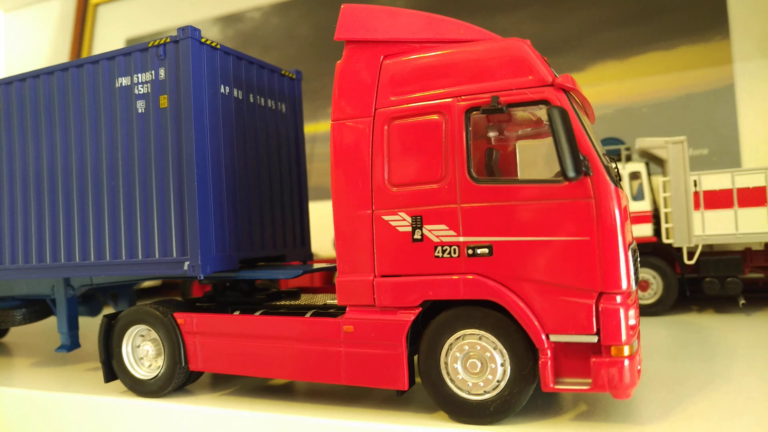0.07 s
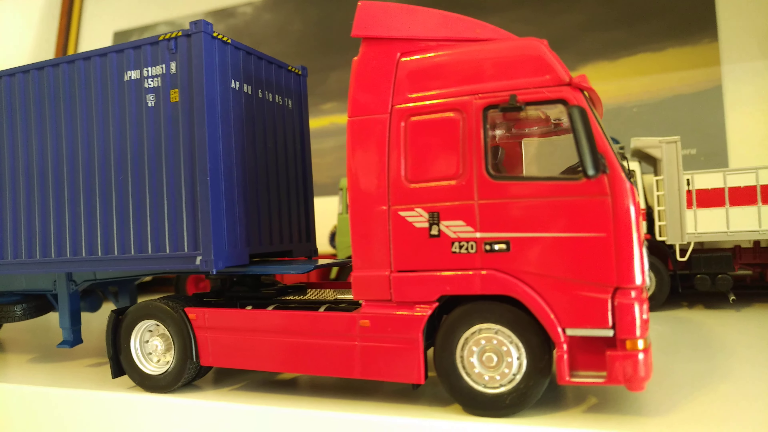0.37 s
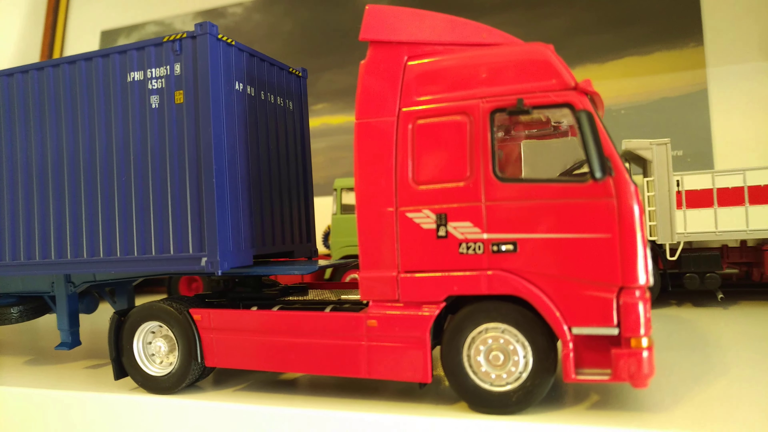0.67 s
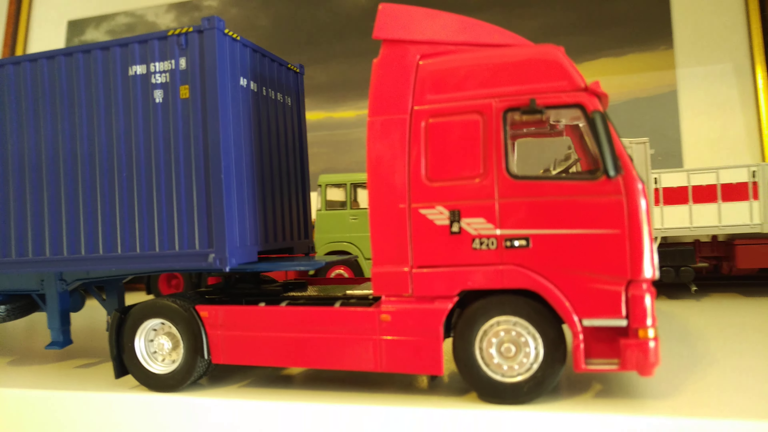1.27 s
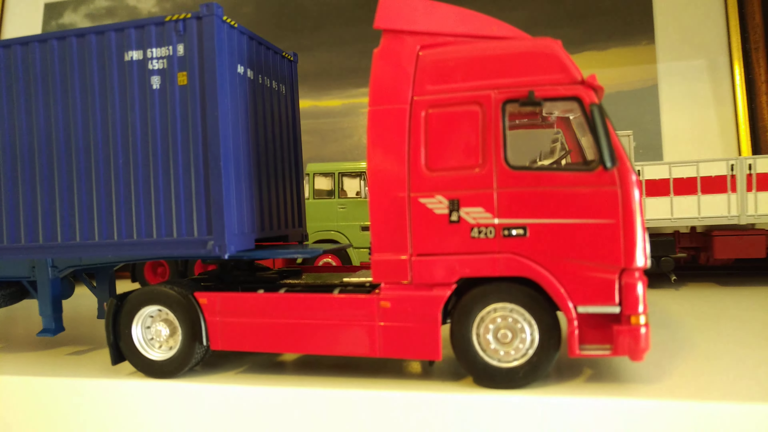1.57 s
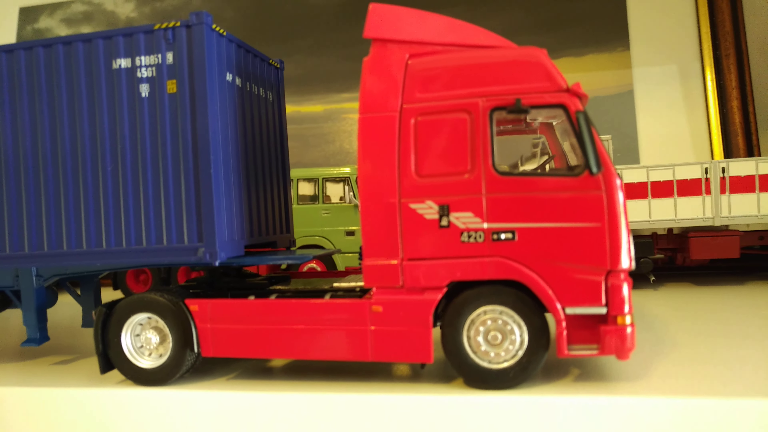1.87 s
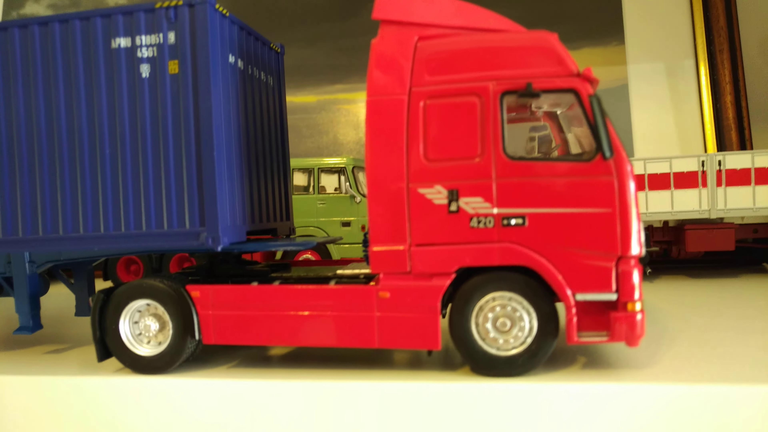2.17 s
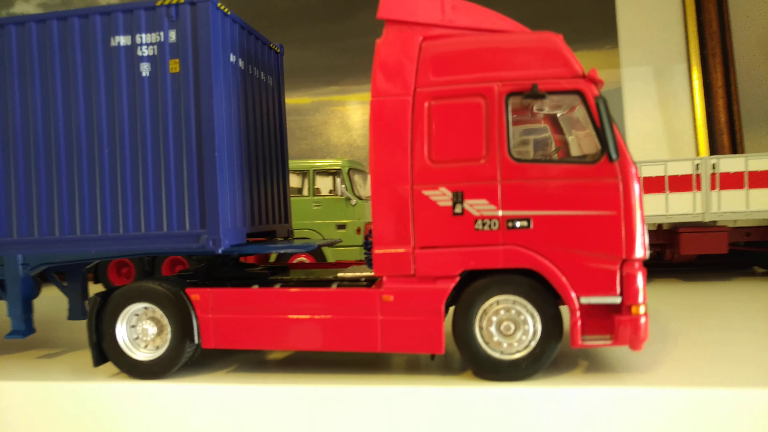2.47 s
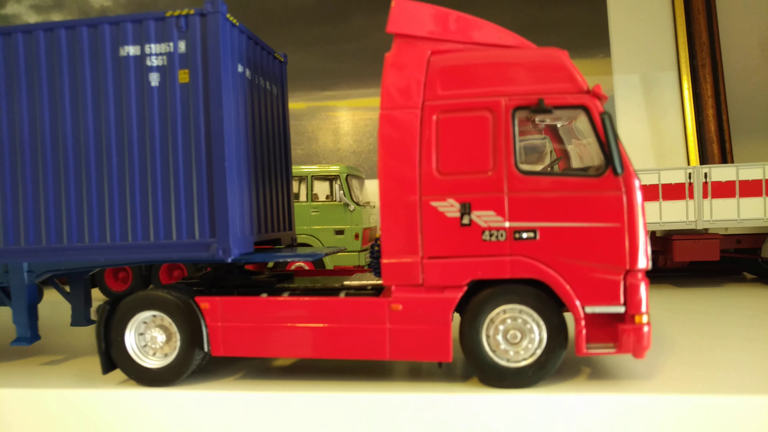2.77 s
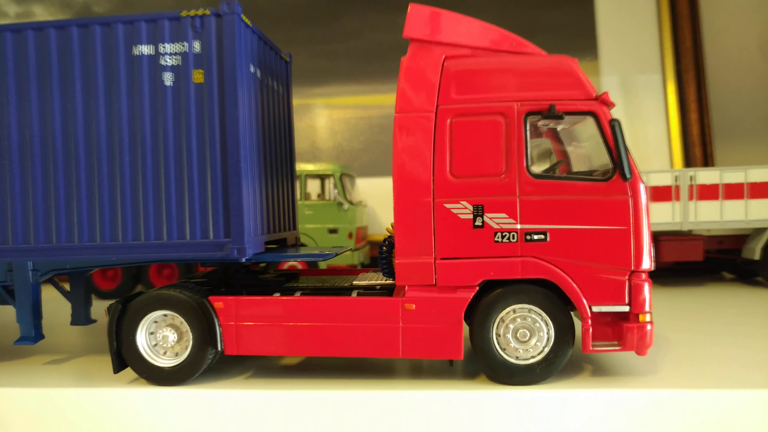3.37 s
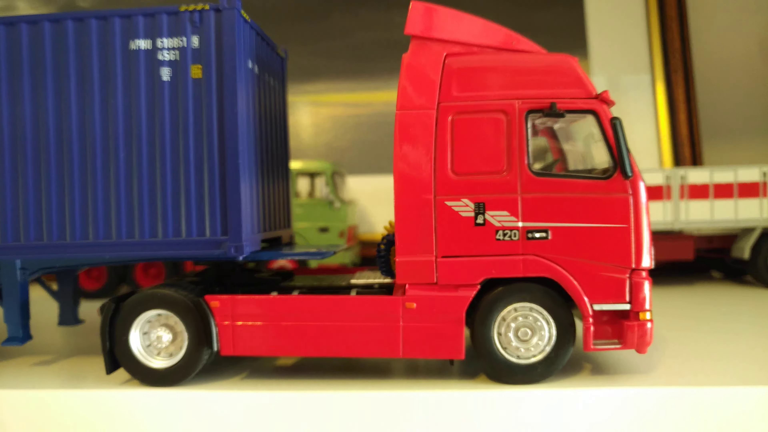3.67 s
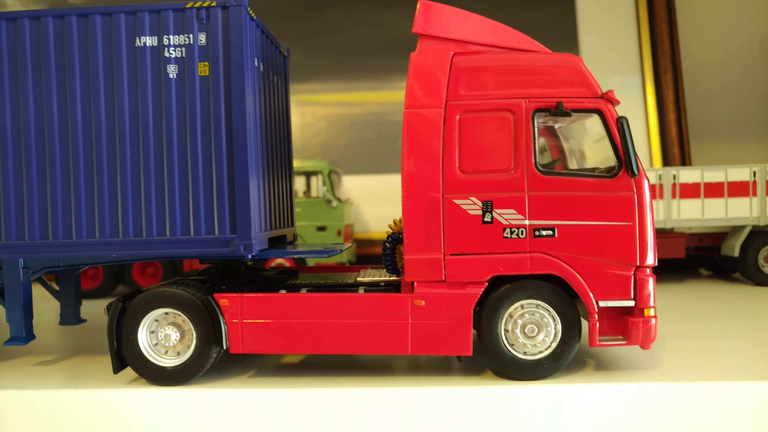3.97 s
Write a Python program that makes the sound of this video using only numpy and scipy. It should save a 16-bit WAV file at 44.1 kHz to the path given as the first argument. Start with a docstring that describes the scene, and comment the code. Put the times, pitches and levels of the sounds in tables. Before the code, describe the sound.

A camera lens motor buzzes from the start, thin and high, close on the right, with hiss, crackle and irregular sharp clicks. The buzz stops at 3.6 seconds, the hiss and last clicks by 3.8. Underneath in the quiet room, a low hum rises slightly, with rumble and a growing wash like distant traffic. Two soft, dull bumps come at about 1.2 and 1.5 seconds, and faint rubbing comes and goes.

```python
"""Camera lens drive in a quiet room

A hand-held camera moves along a shelf of model trucks. Its lens drive, close to the right microphone,
ticks 200 times a second, hisses, crackles and clicks, then rests. Under it: a slowly rising low hum,
a rumble and a growing wash, probably traffic outside, with two soft bumps and faint rubbing."""
import sys
import numpy as np
from scipy import signal
from scipy.fft import rfft, irfft
from scipy.io import wavfile
from scipy.ndimage import uniform_filter1d

SR = 44100
rng = np.random.default_rng(int(sys.argv[2]) if len(sys.argv) > 2 else 0)


def wav_out(sig):
    """Save sig, one row per channel (or a flat mono array), as 16-bit PCM at SR to the path in sys.argv[1]."""
    wavfile.write(sys.argv[1], SR, np.round(np.clip(np.atleast_2d(sig).T, -1, 1) * 32767).astype(np.int16))


N = 176400
T = np.arange(N) / SR
PULSES_END_S, HISS_END_S = 3.605, 3.83
COHERENCE_HZ = 546  # both microphones hear much the same below this


def drive_ticks():
    """Even pulses, stray clicks and uneven servo steps strike the lens housing."""
    # Lens drive clicks. Each row: time in seconds, peak level in dB.
    click_events = [(.0332, -30), (.0622, -24.5), (0.1837, -28), (.1932, -29), (.2002, -31), (.2152, -24),
                    (.2202, -30), (.2352, -28), (0.5793, -25), (.6212, -25), (0.6829, -24), (0.7082, -29),
                    (0.8783, -28), (0.9127, -30), (.9792, -30), (1.0152, -30), (1.0223, -25), (1.0302, -26),
                    (1.1545, -30), (1.3369, -29), (1.3412, -24), (1.4392, -30), (1.5117, -31.5),
                    (1.8122, -34), (1.8325, -25), (1.8404, -24.5), (1.9812, -26), (2.1049, -25),
                    (2.4812, -26.5), (2.7345, -24), (2.9192, -32), (3.1012, -26), (3.3662, -26),
                    (3.576, -26.5), (3.5858, -26), (3.597, -27), (3.606, -28), (3.6122, -25.5),
                    (3.6295, -28), (3.6622, -25), (3.8212, -35.5)]
    click_s, click_db = np.array(click_events).T
    pulse_hz, servo_hz, start_s = 200, 1000, .0012
    pulse_db, servo_db = -39, -57
    rough_span_s, rough_db = .069, 10
    rebound_max_s, rebound_db = .000796, -8.5

    pulse_s = np.arange(start_s, PULSES_END_S, 1 / pulse_hz)
    gap_s = abs(pulse_s[:, None] - click_s).min(axis=1)
    pulse_s = pulse_s[gap_s > .5 / servo_hz]  # a coinciding click replaces the pulse
    pulses = impulses(pulse_s, undb(pulse_db + .5 * rng.standard_normal(len(pulse_s))))

    # Steps crackle harder where clicks crowd.
    step_s = np.arange(start_s, PULSES_END_S, 1 / servo_hz)
    nearness = np.exp(-(2 * (step_s[:, None] - click_s) / rough_span_s) ** 2)
    crowding = np.tanh(nearness.sum(axis=1) / 2)
    step_db = servo_db + rough_db * crowding + 6 * rng.standard_normal(len(step_s))
    polarity = rng.choice([-1, 1], len(step_s))
    crackle = impulses(step_s, undb(np.minimum(step_db, pulse_db)) * polarity)

    rebound_s = click_s + rebound_max_s * rng.uniform(.512, 1, len(click_s))
    clicks = impulses(click_s, undb(click_db)) + impulses(rebound_s, undb(click_db + rebound_db))
    return signal.fftconvolve(clicks + pulses + crackle, housing_tick())[:N]


def housing_tick(size=1024):
    """One tick, envelope peak 1: a sharp snap and the short ring of the housing."""
    # Snap spectrum. Each row: frequency in Hz, level in dB.
    snap_spectrum = [(1000, -37), (3800, -23), (5000, -22), (5500, -11), (6800, -9), (7800, -1.5),
                     (8550, -3.5), (8900, -4.5), (9300, -3), (10500, -9.5), (11200, -2), (12300, 0.5),
                     (13700, -0.5), (14700, -8.5), (15300, -25)]
    # Housing resonances. Each row: centre in Hz, width in Hz, lift in dB.
    modes = [(5540, 580, 7), (9684, 700, 12), (15650, 360, 13)]
    hz = np.fft.rfftfreq(size, 1 / SR)
    lift_db = sum(db / (1 + (2 * (hz - centre_hz) / width_hz) ** 2) for centre_hz, width_hz, db in modes)
    cepstrum = irfft(np.log(colour(snap_spectrum, hz) * undb(lift_db)))
    cepstrum[1:size // 2] *= 2  # fold to minimum phase: sharp onset
    cepstrum[size // 2 + 1:] = 0
    tick = irfft(np.exp(rfft(cepstrum)))
    return tick / abs(signal.hilbert(tick)).max()


def drive_hiss():
    """The drive hisses while it pulses, idles briefly in a narrower band, then rests."""
    # Running hiss spectrum. Each row: frequency in Hz, relative density in dB.
    running_spectrum = [(3000, -38), (5100, -28), (5550, -11), (6300, -13), (7800, -7), (8700, -3),
                        (9450, 7), (10400, -4.5), (13700, -7.5), (15500, -25)]
    # Idle hiss spectrum. Each row: frequency in Hz, relative density in dB.
    idle_spectrum = [(5000, -26), (8400, -11), (9300, 0), (10300, -13), (13000, -26)]
    idling = noise(idle_spectrum) * undb(-59.5) * (T < HISS_END_S)
    running = noise(running_spectrum) * undb(-58.5)
    return np.where(T < PULSES_END_S, running, idling)


def hum():
    """Two low tones drift upward and beat inside an uneven rumble."""
    # Hum pitch. Each row: time in seconds, pitch in Hz.
    pitch_track = [(0, 50.53), (1.1, 50.42), (1.5, 51.42), (2.0, 52.5), (2.6, 54.52), (3.3, 54.5),
                   (4, 53.8)]
    # Lower tone's level. Each row: time in seconds, level in dB.
    tone_levels = [(0, -45), (.35, -40), (.6, -43.5), (1.0, -39), (1.3, -45), (1.55, -37.5), (2.0, -36.5),
                   (2.2, -42.5), (2.38, -37), (2.51, -48.5), (2.65, -37), (2.85, -42.5), (3.1, -37),
                   (3.55, -36), (3.85, -47), (4, -45)]
    # Rumble level. Each row: time in seconds, level in dB.
    rumble_levels = [(0, -53), (1.1, -51.5), (1.55, -43.5), (2.3, -48.5), (2.55, -46.5), (2.75, -42),
                     (3.05, -42), (3.25, -48), (3.55, -45), (4, -52)]
    # Rumble spectrum. Each row: frequency in Hz, relative density in dB.
    rumble_spectrum = [(20, -56), (38, -29), (48, -9.5), (62, -4), (73, 0.5), (84, -5), (91, -2.5),
                       (102, -5), (112, -15), (130, -16.5), (165, -32.5), (300, -74)]
    upper_ratio, upper_db = 1.39, -49
    phase = 2 * np.pi * np.cumsum(curve(pitch_track)) / SR
    lower = np.sin(phase) * undb(curve(tone_levels))
    upper = np.sin(upper_ratio * phase + .54 * wander(rate_hz=4.15)) * undb(upper_db)
    rumble = noise(rumble_spectrum, coherence_hz=320) * undb(curve(rumble_levels))
    return (np.sqrt(2) * (lower + upper) + rumble) * undb([[.3], [-.3]])


def wash():
    """A distant rush, probably traffic, grows and brightens while a resonance in it climbs."""
    # Wash levels. Each row: time in seconds, lows in dB, highs in dB.
    levels = [(0, -59.5, -62.5), (1.1, -60, -61.5), (1.7, -57.5, -59), (2.3, -57, -59), (3.1, -54, -56),
              (3.6, -53.5, -53), (4, -52.5, -52)]
    # Spectrum of the lows. Each row: frequency in Hz, relative density in dB.
    low_spectrum = [(90, -12), (130, 4.5), (165, -2.5), (200, -9.5), (250, -3), (340, 1.5), (415, -6),
                    (540, 1.5), (700, -4.5), (900, -5), (1300, -15), (3000, -27.5)]
    # Spectrum of the highs. Each row: frequency in Hz, relative density in dB.
    high_spectrum = [(500, -11.5), (850, -6), (1150, -1.5), (1800, -2.5), (2200, -6), (3200, -15.5),
                     (5000, -26.5), (9000, -45)]
    ring_start_hz, rise_hz_per_s, ring_width_hz, ring_db = 899.5, 145, 270, -8.5
    low = noise(low_spectrum, COHERENCE_HZ) * undb(curve(levels) + .4 * wander(rate_hz=9))
    lowpass = signal.butter(2, ring_width_hz / 2, fs=SR, output="sos")
    baseband = signal.sosfilt(lowpass, rng.standard_normal((2, 2, N)))
    phase = 2 * np.pi * np.cumsum(ring_start_hz + rise_hz_per_s * T) / SR
    ring = (baseband[0] * np.cos(phase) + baseband[1] * np.sin(phase)) / baseband.std()
    high = noise(high_spectrum, COHERENCE_HZ) + ring * undb(ring_db)
    high *= undb(curve(levels, column=2) + .4 * wander(rate_hz=11))
    return (low + high) * undb([[-.4], [.4]])


def bumps():
    """Dull, soft knocks, each with a tail from the room."""
    # Bumps. Each row: start in seconds, level in dB.
    events = [(1.196, -50.5), (1.511, -56.5)]
    # Bump spectrum. Each row: frequency in Hz, relative density in dB.
    spectrum = [(200, -17), (280, -5.5), (345, 6), (430, -6.5), (550, -0.5), (800, -4.5), (1200, -9.5),
                (2500, -20), (6000, -52)]
    attack_s, decay_s, tail_s, tail_db = .024, .11, .36, -8
    envelope = 0
    for start_s, db in events:
        rise = np.clip((T - start_s) / attack_s, 0, 1)
        age_s = np.maximum(T - start_s - attack_s, 0)
        fall = np.exp(-age_s / decay_s) + undb(tail_db) * np.exp(-age_s / tail_s)
        envelope += undb(db) * rise * fall
    return envelope * noise(spectrum, COHERENCE_HZ)


def rubs():
    """Faint rubbing: bands of resonant noise that swell and fade."""
    # Rubs. Each row: start in seconds, length in seconds, centre in Hz, width in Hz, level in dB.
    events = [(0.598, 0.26, 3580, 600, -68), (0.68, 0.29, 4300, 600, -65.5),
              (0.86, 0.52, 4170, 1300, -67.5), (1.88, 0.16, 5340, 600, -67),
              (1.952, 0.37, 3930, 2840, -63.5), (3.28, 0.4, 5820, 200, -68)]
    swishes = 0
    for start_s, length_s, centre_hz, width_hz, db in events:
        b, a = signal.iirpeak(centre_hz, centre_hz / width_hz, fs=SR)
        band = signal.lfilter(b, a, signal.lfilter(b, a, rng.standard_normal((2, N))))
        progress = np.clip((T - start_s) / length_s, 0, 1)
        swishes += band / band.std() * undb(db) * np.sin(np.pi * progress)
    return swishes


def microphone_hiss():
    """Steady self-noise of the microphones."""
    # Noise floor spectrum. Each row: frequency in Hz, relative density in dB.
    spectrum = [(1000, 2.5), (3000, 10.5), (6000, 4), (9000, -15), (15000, -19)]
    return noise(spectrum, COHERENCE_HZ) * undb(-70)


def undb(db):
    """Decibels to gain."""
    return 10 ** (np.asarray(db) / 20)


def curve(rows, column=1):
    """One table column, linearly interpolated over time."""
    rows = np.array(rows)
    return np.interp(T, rows[:, 0], rows[:, column])


def colour(spectrum, hz):
    """Gain of a (Hz, dB) table at the given frequencies."""
    knot_hz, db = np.array(spectrum).T
    return undb(np.interp(np.log(hz + 1), np.log(knot_hz), db))


def noise(spectrum, coherence_hz=None):
    """Coloured noise, rms 1: mono, or with coherence_hz a stereo pair alike in the bass."""
    hz = np.fft.rfftfreq(N, 1 / SR)
    bins, side = rfft(rng.standard_normal((2, N))) * colour(spectrum, hz)
    if coherence_hz is not None:
        coherence = 1 / (1 + (hz / coherence_hz) ** 3)
        bins = bins * np.sqrt(1 + coherence) + np.array([[1], [-1]]) * side * np.sqrt(1 - coherence)
    y = irfft(bins, N)
    return y / y.std()


def wander(rate_hz):
    """Smooth random drift, standard deviation 1."""
    hold = int(SR / rate_hz)
    steps = np.repeat(rng.standard_normal(N // hold + 2), hold)
    drift = uniform_filter1d(uniform_filter1d(steps, hold), hold)[:N]
    return drift / drift.std()


def impulses(times_s, gains, oversample=4):
    """Impulses with sub-sample timing."""
    train = np.zeros(N * oversample)
    index = np.round(times_s * SR * oversample).astype(int)
    np.add.at(train, np.clip(index, 0, len(train) - 1), gains)
    return signal.resample_poly(train, 1, oversample) * oversample


def scene():
    """The lens drive on the right, over the room and the microphone hiss."""
    left_leak_db = -30
    drive = (drive_ticks() + drive_hiss()) * undb([[left_leak_db], [0]])
    return drive + hum() + wash() + microphone_hiss() + bumps() + rubs()


def record(dry):
    """The camera cuts the top treble."""
    cutoff_hz = 16300
    return signal.sosfilt(signal.ellip(8, .2, 70, cutoff_hz, fs=SR, output="sos"), dry)


dry = scene()
out = record(dry)
wav_out(out)
```